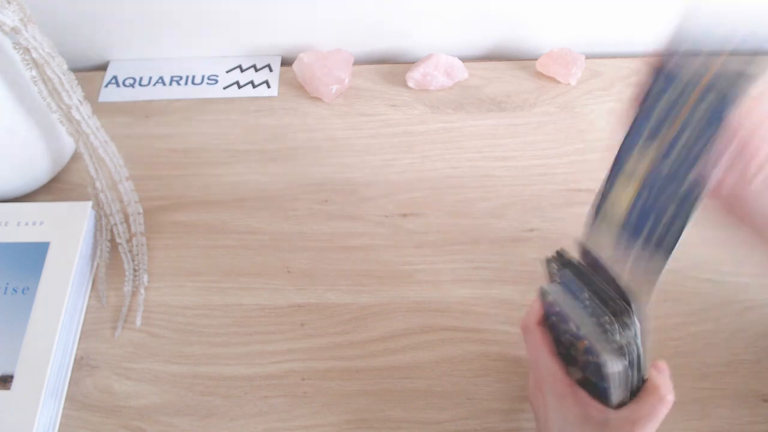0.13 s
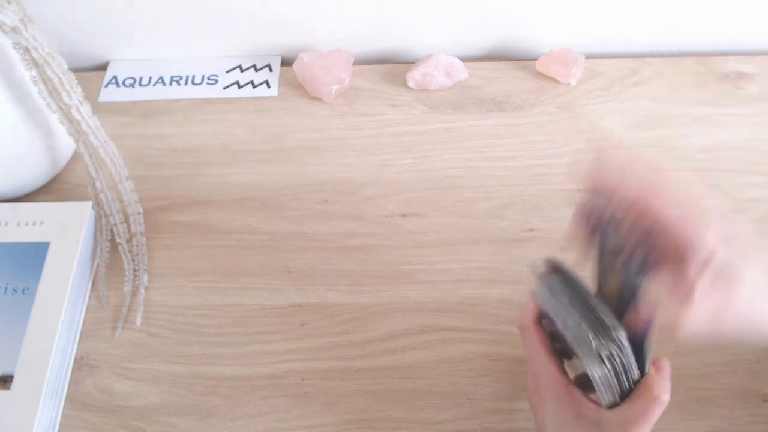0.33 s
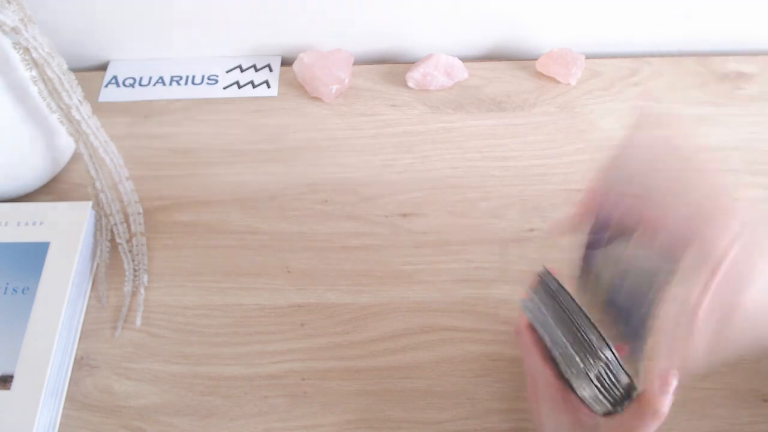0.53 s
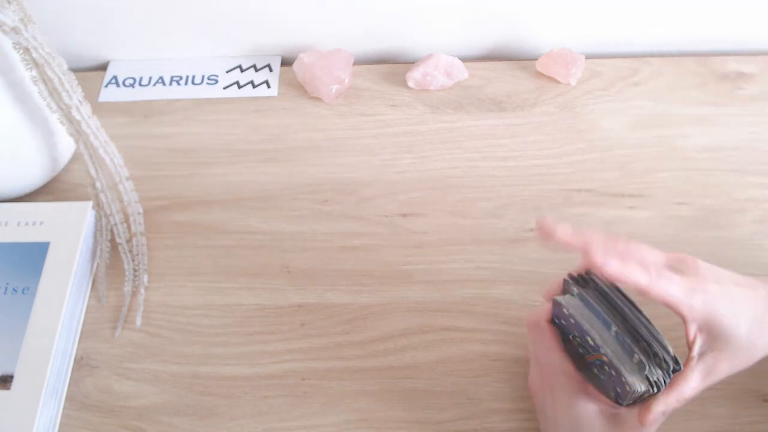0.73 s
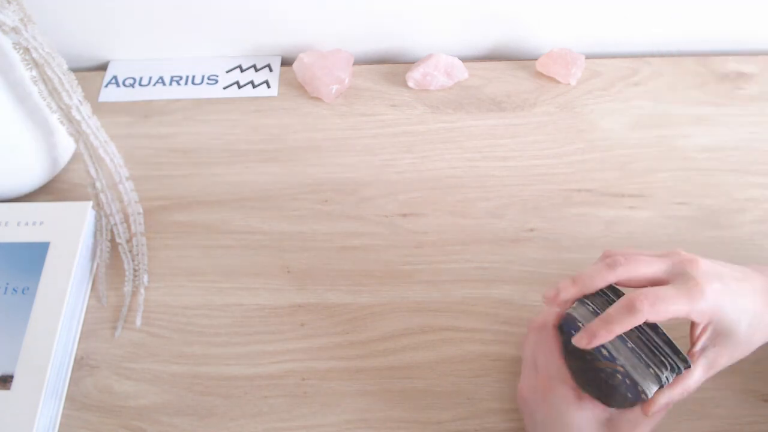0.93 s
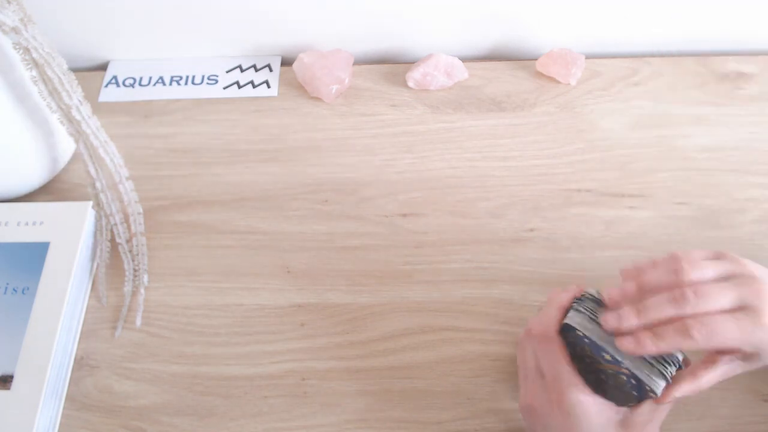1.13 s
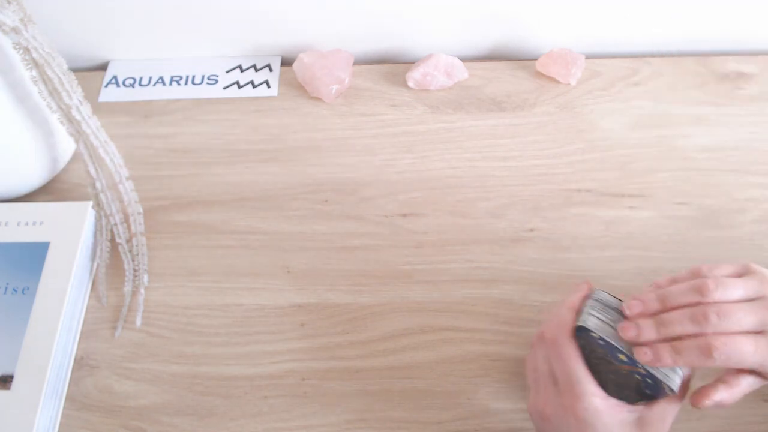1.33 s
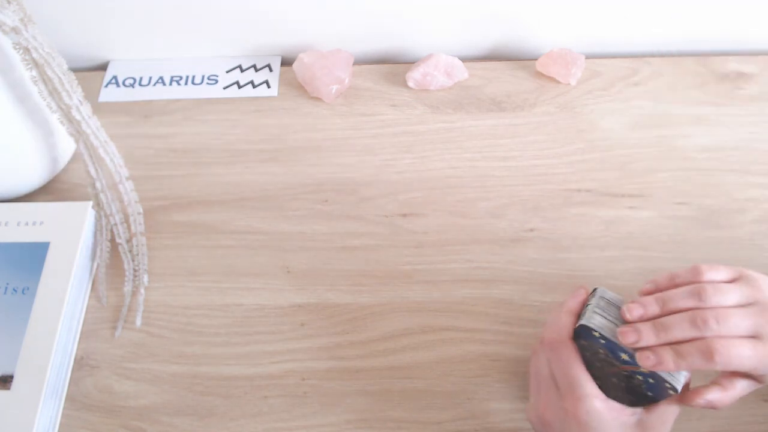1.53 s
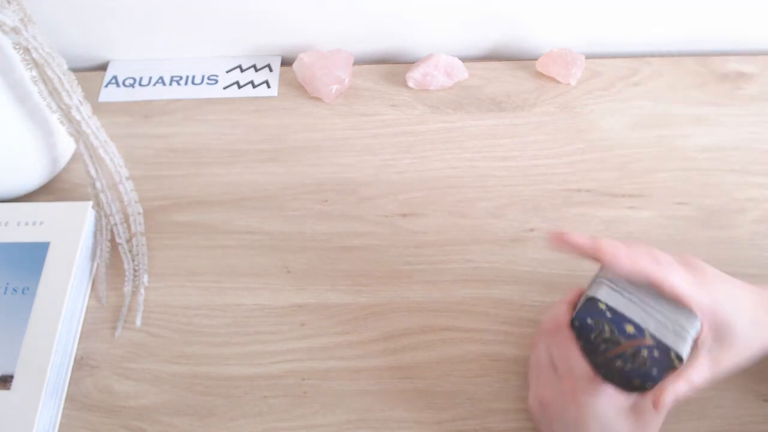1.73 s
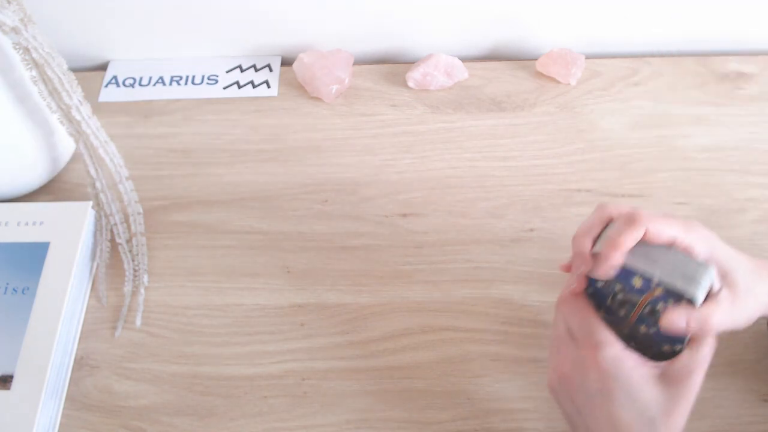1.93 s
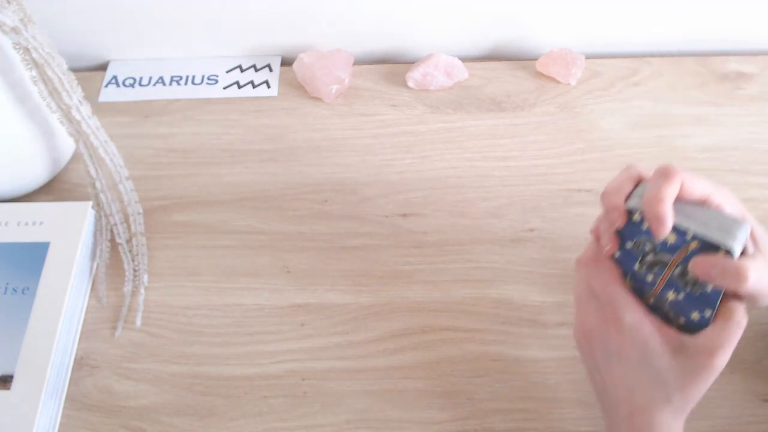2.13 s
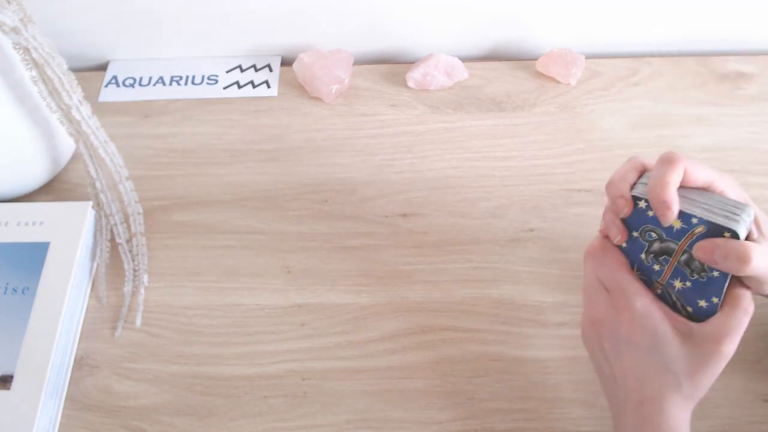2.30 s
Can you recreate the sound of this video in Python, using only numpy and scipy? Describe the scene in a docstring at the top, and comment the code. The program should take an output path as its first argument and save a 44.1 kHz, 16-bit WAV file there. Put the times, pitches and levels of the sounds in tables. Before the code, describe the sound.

Overhand card shuffle heard close and dry: packets hiss and crack down in the first three quarters of a second, then dull knocking pats align the cards, followed by faint handling and low room noise.

```python
"""A small, quiet room: cards are shuffled overhand close to a microphone, then patted square.
Packets slide with a hiss of dense tiny slips and snap down with a bright crack and a damped deck knock.
Palm blows ring the deck's hollow modes while random knocks rattle the cards into line.
The swinging hand pushes slow air at the microphone; sparse reflections and steady noise form the room."""
import sys
import numpy as np
from scipy import signal
from scipy.fft import rfft, irfft
from scipy.io import wavfile

SR = 44100
rng = np.random.default_rng(int(sys.argv[2]) if len(sys.argv) > 2 else 0)


def bounce(signal):
    """Save signal as a 16-bit WAV file at the path given by the first command-line argument."""
    frames = np.transpose(np.atleast_2d(signal))
    limited = np.clip(frames, -1, 1)
    pcm = np.round(limited * 32767).astype(np.int16)
    wavfile.write(sys.argv[1], SR, pcm)


N = 104252

# Card faces sliding: (time [s], level [dB], tilt [dB/octave], limited to -6..9 in use)
SLIDE_LEVELS = [(0.0, -42, -1), (0.01, -63.5, -24), (0.02, -58, -6), (0.034, -66.5, -15), (0.082, -60, -18),
                (0.091, -51, 0.5), (0.108, -46.5, 0), (0.134, -64, -4), (0.188, -77, -4), (0.244, -115, -5),
                (0.254, -55, 5), (0.302, -67.5, -3), (0.34, -66, -2), (0.354, -48.5, 2),
                (0.466, -88.5, -12), (0.532, -73, -10), (0.55, -60, -7), (0.554, -52, -2),
                (0.564, -62.5, 1), (0.676, -91, 0), (0.686, -68.5, -7), (0.798, -73.5, -15),
                (0.866, -98, -15), (0.9, -66.5, -12)]
# Fingers shifting on the deck: (time [s], level [dB])
FINGER_RUB_LEVELS = [(1.58, -79.5), (1.74, -72), (1.754, -78), (1.94, -100), (1.988, -75), (2.008, -91),
                     (2.04, -72), (2.122, -84), (2.2, -96)]
# Broad resonances of a card face: (frequency [Hz], width [Hz], level [dB])
FACE_RESONANCES = [(4930, 990, 7.5), (9140, 1000, 9.5), (10570, 2200, 5), (14200, 1700, 9)]
SLIPS_PER_S, SLIP_SPREAD_DB = 15000, 8
SLIDE_LOW_CUT_HZ, SLIDE_GAIN = 3400, 0.28


def slides():
    """Dense tiny slips ring the broad resonances of the card faces."""
    tilt_db = np.clip(curve(SLIDE_LEVELS, column=2), -6, 9)
    hiss = np.zeros(N)
    for hz, width_hz, db in FACE_RESONANCES:
        slips = ticks(SLIPS_PER_S, SLIP_SPREAD_DB)
        face = ring([(hz, 0, 1.27 / width_hz)], rise_s=0.00005)[:400]
        face = face / np.linalg.norm(face)
        gain = amp(db + tilt_db * np.log2(hz / 8000))
        hiss += gain * signal.oaconvolve(slips, face)[:N]
    low_cut = signal.butter(4, SLIDE_LOW_CUT_HZ, "high", fs=SR, output="sos")
    hiss = signal.sosfilt(low_cut, hiss) / np.std(slips)
    level = amp(curve(SLIDE_LEVELS)) + amp(curve(FINGER_RUB_LEVELS))
    return SLIDE_GAIN * hiss * level


# Packet edges snapping on the deck: (time [s], snap peak [dB], knock peak [dB], flutter decay [s],
# favoured pitch [Hz], snap tilt [dB/octave])
SNAP_EVENTS = [(0.0162, -35.5, -42.5, 0.0039, 990, -2), (.066, -51, -52, 0.0039, 845, -16),
               (.089, -45, -49, 0.0032, 810, -2), (0.1235, -50, -54.5, 0.0037, 805, -22),
               (0.254, -28.5, -41.5, 0.002, 750, 8.5), (0.2761, -35, -33, 0.0009, 1000, -2.5),
               (.283, -49, -42.5, 0.0021, 650, 7), (.3275, -46, -45, 0.0027, 730, -9),
               (.379, -41, -40, .003, 770, -5), (.384, -61, -49, .002, 517, 3),
               (0.5396, -29.5, -56, 0.0019, 613, 8), (.5506, -21.5, -32, 0.0012, 334, 5),
               (.687, -45, -52, 0.0018, 750, 6), (0.7413, -44.5, -61, 0.001, 665, 6),
               (2.0853, -50, -50, 0.0011, 630, -3)]
# Snap spectrum before tilt: (frequency [Hz], relative density [dB per Hz])
SNAP_SPECTRUM = [(880, -62), (1500, -17), (2230, -4), (4000, 5), (5700, 8), (7000, -14), (9750, -3),
                 (11500, -18), (13300, -18), (16000, -23)]
# Ring of deck and cupped hands, undamped: (frequency [Hz], level [dB], t60 [s])
DECK_MODES = [(337, -7.5, 0.11), (352, -8.5, 0.06), (548, -1, 0.074), (474, -10.5, 0.058),
              (651, -10, 0.066), (804, -0.5, 0.024), (1010, -10.5, 0.058), (1140, -7.5, 0.017),
              (1434, -7, 0.027), (1697, -12, 0.042), (1880, -12.5, 0.039), (2167, -13, 0.023)]
# Low thump modes, undamped: (frequency [Hz], level [dB], t60 [s])
THUMP_MODES = [(97, 0, 0.22), (166.3, 2, 0.1), (207, -2, 0.092), (240, -0.5, 0.076), (293.5, 1, 0.086)]
SNAP_RISE_S, SNAP_TICK, KNOCK_T60_FACTOR = 0.001093, 5.8, 0.21


def snaps():
    """Each landing packet gives a tick, a short flutter of bright noise and a damped deck knock."""
    out = np.zeros(N)
    t = np.arange(2048) / SR
    tick = SNAP_TICK * (np.arange(len(t)) == round(SNAP_RISE_S * SR))
    for s, snap_db, knock_db, flutter_s, pitch_hz, tilt_db in SNAP_EVENTS:
        rise = np.minimum(t / SNAP_RISE_S, 1) ** 3
        decay = np.exp(-np.maximum(t - SNAP_RISE_S, 0) / flutter_s)
        spectrum = [(hz, db + tilt_db * np.log2(hz / 6000)) for hz, db in SNAP_SPECTRUM]
        noise = rng.standard_normal(len(t))
        crack = coloured(noise + tick, spectrum) * rise * decay
        add(out, s, amp(snap_db) * crack / abs(crack).max())
        modes = favoured(THUMP_MODES + DECK_MODES, pitch_hz, KNOCK_T60_FACTOR)
        add(out, s, -amp(knock_db) * ring(modes, rise_s=0.0001))
    return out


# Palm blows on the deck: (time [s], deck peak [dB], edge click peak [dB], thump peak [dB],
# contact decay [s], favoured pitch [Hz], favoured thump pitch [Hz])
PAT_EVENTS = [(.918, -24, -67, -41, 0.00088, 1420, 167), (.922, -27.5, -79, -34.5, 0.00093, 580, 300),
              (.937, -45, -75, -40.5, 0.006, 493, 171), (1.071, -42.5, -61, -46, 0.0022, 1430, 200),
              (1.105, -33.5, -46, -42, 0.0038, 880, 199), (1.118, -34.5, -69, -38, 0.00094, 785, 173),
              (1.129, -29.5, -43, -39, 0.0038, 770, 202), (1.141, -32.5, -41, -63, 0.00065, 730, 240),
              (1.148, -34.5, -41.5, -45, 0.0036, 1040, 203), (1.158, -30, -49, -45.5, 0.0016, 1010, 198),
              (1.295, -47, -74, -39, 0.0018, 565, 169), (1.318, -41, -72, -38, 0.0021, 560, 182),
              (1.346, -27.5, -38, -40.5, 0.0022, 1430, 199), (1.372, -35, -53, -43.5, 0.00071, 570, 193),
              (1.545, -43, -51, -51, 0.0016, 1620, 174), (1.554, -33, -70, -43, 0.0015, 530, 210),
              (1.580, -40, -68, -46, 0.00074, 694, 202), (1.606, -37.5, -70, -63, 0.0021, 1040, 200),
              (1.626, -43, -62, -47, 0.00067, 1290, 222)]
# Card edge modes, undamped: (frequency [Hz], level [dB], t60 [s])
EDGE_MODES = [(2734, 9, 0.0098), (3226, 4.5, 0.018), (3770, 0.5, 0.01), (4470, 4.5, 0.005),
              (5620, 2, 0.0065)]
PAT_RISE_S, PAT_ROUGHNESS = 0.00111, 0.24


def pats():
    """Each blow is a firm tick with a rough trail that sets deck, palm and card edges ringing."""
    out = np.zeros(N)
    t = np.arange(600) / SR
    for s, deck_db, edge_db, thump_db, contact_s, pitch_hz, thump_hz in PAT_EVENTS:
        trail = np.minimum(t / PAT_RISE_S, 1) * np.exp(-t / contact_s)
        push = PAT_ROUGHNESS * rng.standard_normal(len(t)) * trail
        push[round(PAT_RISE_S * SR)] += 1
        parts = [(favoured(DECK_MODES, pitch_hz), deck_db),
                 (favoured(THUMP_MODES, thump_hz), thump_db),
                 (EDGE_MODES, edge_db)]
        for modes, peak_db in parts:
            sound = signal.fftconvolve(push, ring(modes, rise_s=0.00027))
            add(out, s, amp(peak_db) * sound / abs(sound).max())
    return out


# Cards rattling into line: (time [s], level [dB], thump above it [dB], edge above it [dB],
# deck tilt [dB/octave])
RATTLE_LEVELS = [(0.9, -84, 0, -25, -2), (0.91, -75, 18, -12, 11), (0.92, -39, -1, -18, -9),
                 (0.946, -42.5, -7.5, -32.5, 1), (1.04, -58.5, -3, -33, -8), (1.138, -37.5, -9, -22.5, 5),
                 (1.272, -65, -5, -26, -1.5), (1.316, -52, 3.5, -39, -4), (1.34, -46, 0, -27, -4),
                 (1.352, -44, -12, -22, 2), (1.438, -63.5, 1, -14, 6), (1.486, -92, -3, -27, 0),
                 (1.522, -95, -15, -25, -12), (1.544, -39.5, -7, -39, 4), (1.558, -46.5, -0.5, -28, -0.5),
                 (1.588, -51.5, 11, -29, -5), (1.606, -45, -10, -30, -4), (1.66, -64, -10, -14, 3),
                 (1.71, -56.5, 0.5, -24, -6), (1.736, -54, -18, -14, 4.5), (1.848, -93, -10, -31, -12),
                 (1.858, -63, -28, -29, -11.5), (1.934, -85, 11, -28, 8), (1.974, -59, -5, -37, -9),
                 (2.058, -65, -0.5, -26, 4.5), (2.084, -65.5, -4.5, -33, 5), (2.2, -86, 17, -26.5, 1)]
# Deck creaking in the holding hand: (time [s], level [dB])
CREAK_LEVELS = [(0.0, -41), (0.014, -47), (0.208, -64.5), (0.284, -43.5), (0.3, -56), (0.338, -49.5),
                (0.37, -81), (0.38, -44.5), (0.438, -69), (0.526, -59), (0.554, -30), (0.57, -60),
                (0.62, -57), (0.9, -65.5)]
RATTLES_PER_S, RATTLE_SPREAD_DB, RATTLE_T60_FACTOR, RATTLE_GAIN_DB = 1500, 5.5, 0.39, -10


def rattle():
    """Random knocks between cards, and creaks of the held deck, each ring one mode briefly."""
    level_db, thump_db, edge_db, tilt_db = (curve(RATTLE_LEVELS, column=k) for k in (1, 2, 3, 4))
    tilt_db = np.clip(tilt_db, -20, 20)
    creak = amp(curve(CREAK_LEVELS))
    out = np.zeros(N)
    # (modes, rattle offset [dB], creak offset [dB], tilt [dB/octave])
    parts = [(DECK_MODES, 0, -3, tilt_db), (THUMP_MODES, thump_db, -9, 0), (EDGE_MODES, edge_db, -25, 0)]
    for modes, extra_db, creak_db, part_tilt_db in parts:
        for hz, db, t60_s in modes:
            knocks = ticks(RATTLES_PER_S, RATTLE_SPREAD_DB)
            body = ring([(hz, 0, RATTLE_T60_FACTOR * t60_s)], rise_s=0.00083)
            force = amp(level_db + extra_db + part_tilt_db * np.log2(hz / 800))
            force = force + creak * amp(creak_db)
            sound = signal.oaconvolve(knocks * force, body)[:N]
            out += amp(db + RATTLE_GAIN_DB) * sound / np.std(knocks) / np.linalg.norm(body)
    return out


# Air stirred at the microphone: (time [s], level [dB])
RUMBLE_LEVELS = [(0.0, -48), (0.06, -39), (0.11, -40), (0.18, -46), (0.29, -38.5), (0.46, -40.5),
                 (0.52, -41), (0.72, -46.5), (1.68, -46), (1.7, -37), (1.75, -46), (2.31, -53), (2.36, -55)]
# Rumble spectrum: (frequency [Hz], relative density [dB per Hz])
RUMBLE_SPECTRUM = [(3, 1), (7, -1), (14, -2), (32, -12.5), (59, -20.5), (129, -48.5), (200, -51),
                   (330, -120)]
SWING_HZ, SWING_PEAK_S = 3.81, 0.045
SWING_START_DB, SWING_SLOPE_DB_PER_S, OFFSET = -24.5, -17, 0.0059


def air():
    """A fading slow pressure swing from the hand, a lumpy noise rumble and a constant offset."""
    t = np.arange(N) / SR
    swing_level = amp(SWING_START_DB + SWING_SLOPE_DB_PER_S * t)
    swing = swing_level * np.cos(2 * np.pi * SWING_HZ * (t - SWING_PEAK_S))
    rumble = amp(curve(RUMBLE_LEVELS)) * coloured(rng.standard_normal(N), RUMBLE_SPECTRUM)
    return OFFSET + swing + rumble


ROOM_T60_S, ROOM_LOWPASS_HZ, ROOM_DB = 0.28, 4630, -13


def room(x):
    """Sparse reflections of random sign, dying away, duller than the direct sound."""
    taps = np.zeros(SR // 2)
    at = np.arange(150, SR // 2 - 20, 20)
    at = at + rng.integers(0, 20, len(at))
    taps[at] = rng.choice([-1., 1.], len(at))
    taps *= amp(-60 * np.arange(len(taps)) / SR / ROOM_T60_S)
    r = np.exp(-2 * np.pi * ROOM_LOWPASS_HZ / SR)
    taps = signal.lfilter([1 - r], [1, -r], taps)
    return amp(ROOM_DB) * signal.fftconvolve(x, taps / np.linalg.norm(taps))[:N]


# Quiet of the room: (frequency [Hz], relative density [dB per Hz])
QUIET_SPECTRUM = [(35, -46), (60, 5.5), (96, -0.5), (139, -0.5), (256, -11.5), (408, -15), (2580, -24),
                  (16000, -29.5)]
QUIET_RMS_DB = -59.5


def quiet():
    """Steady noise, strongest in the bass."""
    return amp(QUIET_RMS_DB) * coloured(rng.standard_normal(N), QUIET_SPECTRUM)


def amp(db):
    """Amplitude factor of a level in dB."""
    return 10 ** (np.asarray(db) / 20)


def curve(points, column=1):
    """A column of a time table at every sample; -140 outside."""
    p = np.array(points)
    return np.interp(np.arange(N) / SR, p[:, 0], p[:, column], -140, -140)


def coloured(x, points):
    """x shaped by a spectrum, rms 1."""
    f, db = np.transpose(points)
    hz = np.fft.rfftfreq(len(x), 1 / SR)
    shape_db = np.interp(np.log(hz + 1), np.log(f + 1), db, -90, -90)
    y = irfft(rfft(x) * amp(shape_db), len(x))
    return y / np.sqrt(np.mean(y ** 2) + 1e-20)


def ring(modes, rise_s):
    """Response of an object to one soft tick, peak 1; successive modes start in opposite directions."""
    t = np.arange(SR // 5) / SR
    x = np.zeros(len(t))
    for k, (hz, db, t60_s) in enumerate(modes):
        x += (-1) ** k * amp(db - 60 * t / t60_s) * np.sin(2 * np.pi * hz * t)
    x *= 1 - np.exp(-t / rise_s)
    return x / abs(x).max()


FAVOUR_DB_PER_OCTAVE = -10


def favoured(modes, pitch_hz, t60_factor=1):
    """Where the deck is struck decides which modes sound most."""
    return [(hz, db + FAVOUR_DB_PER_OCTAVE * abs(np.log2(hz / pitch_hz)), t60_factor * t60_s)
            for hz, db, t60_s in modes]


def ticks(per_s, spread_db):
    """Random ticks of uneven size and sign."""
    when, size, sign = rng.random((3, N))
    size_db = spread_db * np.minimum(-np.log(size + 1e-9), 4)
    return (when < per_s / SR) * amp(size_db) * np.sign(sign - 0.5)


def add(mix, s, sound):
    """Adds sound into mix from time s [s], cut at the end."""
    part = mix[round(s * SR):][:len(sound)]
    part += sound[:len(part)]


def scene():
    """Cards, their reflections, moving air and the quiet, in one channel."""
    cards = slides() + snaps() + pats() + rattle()
    return (cards + room(cards) + air() + quiet())[None]


LOW_PASS_HZ = 15750


def record(dry):
    """Steep linear-phase low-pass: nothing sounds above about 16 kHz."""
    low_pass = signal.firwin(511, LOW_PASS_HZ, window=("kaiser", 9), fs=SR)
    return signal.oaconvolve(dry, low_pass[None], "same")


dry = scene()
out = record(dry)
bounce(out)
```